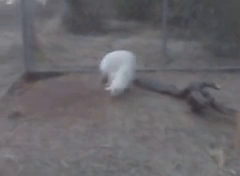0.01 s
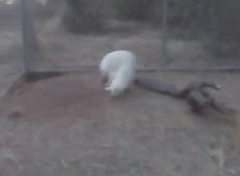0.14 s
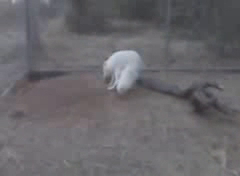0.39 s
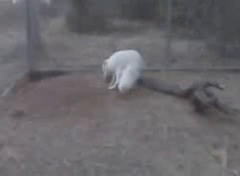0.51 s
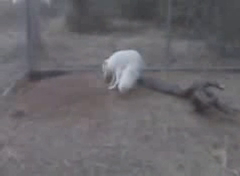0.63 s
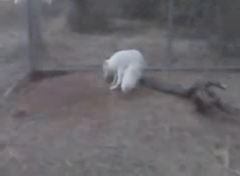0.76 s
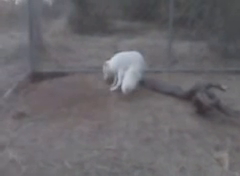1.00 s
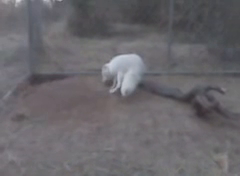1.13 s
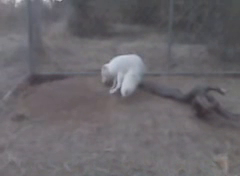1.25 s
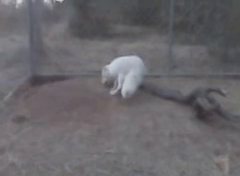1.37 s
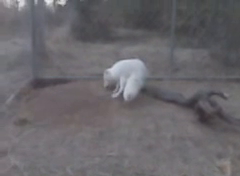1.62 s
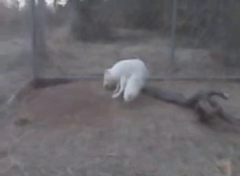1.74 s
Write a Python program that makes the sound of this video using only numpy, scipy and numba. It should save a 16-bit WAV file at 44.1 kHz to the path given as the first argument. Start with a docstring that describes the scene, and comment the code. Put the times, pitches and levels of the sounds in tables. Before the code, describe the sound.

A fox gives one loud, harsh cry in an outdoor pen. After a tiny mouth click and breath at 0.1 seconds, the cry scoops up raspily, peaks around 0.35 seconds with slight distortion, then sags slowly in pitch. It stops abruptly at 1.1 seconds with a puff of air and a very short echo. A faint dull bump follows at 1.3 seconds, and faint hiss runs throughout.

```python
"""An outdoor pen: a white fox gives one loud, harsh cry that scoops up, sags slowly and stops abruptly.
Throat pulses ring in five moving resonances over a chest tone, with rasp at the attack and the cutoff.
A mouth click and a breath lead in; a toneless puff, a short echo and a dull bump follow, over faint hiss.
The recorder hears only up to the low treble and is overloaded by the peaks of the cry."""
import sys
import numpy as np
from scipy import signal
from scipy.fft import rfft, irfft
from scipy.io import wavfile
from scipy.ndimage import uniform_filter1d
from numba import njit

SR = 44100
rng = np.random.default_rng(int(sys.argv[2]) if len(sys.argv) > 2 else 0)


def inscribe(sig):
    """Save sig as 16-bit PCM at rate SR to the path in sys.argv[1].

    A 1-D sig is mono; a 2-D sig holds one channel per row.
    Samples are clipped to [-1, 1] before scaling.
    """
    pcm = np.round(np.clip(np.atleast_2d(sig).T, -1, 1) * 32767)
    wavfile.write(sys.argv[1], SR, pcm.astype(np.int16))


N = 79380
T = np.arange(N) / SR


def cry():
    """The voice: unsteady throat pulses ring through the mouth, with the chest sounding underneath."""
    # pitch of the cry (time [s], pitch [Hz])
    pitch_curve = [(.15, 168), (.186, 195.8), (.22, 215.3), (.24, 220.7), (.298, 232.1), (.352, 233.6),
                   (.44, 231.2), (.55, 226.5), (.66, 222.6), (.77, 220), (.88, 219.2), (.99, 218.5),
                   (1.085, 218.9), (1.125, 199)]
    # rasp, the amount of turbulence and shake in the voice (time [s], level [dB])
    rasp_curve = [(.15, 2.5), (.19, -11), (.24, -28.5), (.28, -27), (.32, -14), (.43, -14), (.49, -22.5),
                  (.8, -24), (.88, -21.5), (1.08, -21), (1.11, 7)]
    pitch_hz, = in_time(pitch_curve)
    rasp = from_db(in_time(rasp_curve)[0])
    jitter = .0025 * drift(rate_hz=60)
    phase = 2 * np.pi * np.cumsum(pitch_hz * (1 + jitter)) / SR
    shake = rasp * flutter(phase)
    return vocal_tract(throat(phase, rasp, shake)) + chest(phase, rasp, shake)


def flutter(phase):
    """Strong and weak pulses alternate at a little over half the pulse rate, with wandering timing."""
    wander_rad = .89 * drift(rate_hz=26)
    return np.sqrt(2) * np.cos(.55 * phase + wander_rad)


def throat(phase, rasp, shake):
    """A buzz of pulses and pulsed turbulence; rasp makes single pulses come early or late."""
    stumbling = phase + .041 * rasp * drift(rate_hz=129)
    buzz = unit_rms(sum(np.cos(k * stumbling) for k in range(1, 21)))
    shimmer_db = .5 * drift(rate_hz=110)
    pulses = buzz * from_db(shimmer_db) * (1 + .8 * shake)
    # bright turbulence (frequency [Hz], relative level [dB])
    colour = [(100, -22), (4000, 8.5), (5000, -27)]
    turbulence = noise(colour) * (1 + .23 * np.cos(phase))
    return pulses + from_db(-4) * rasp * turbulence


def vocal_tract(source):
    """Five gliding resonances of throat and mouth shape the vowel, each riding its own level curve."""
    # resonance tracks, low to high (time [s], centre [Hz], level [dB])
    first = [(.14, 834, -41.5), (0.167, 896, -40), (0.189, 896, -27.5), (0.219, 930, -13),
             (0.281, 985, -15), (.33, 904, -16), (.41, 934, -16), (.52, 964, -14.5), (.7, 995, -13.5),
             (1.09, 970, -14.5), (1.103, 880, -28), (1.129, 860, -88)]
    second = [(.15, 1500, -74), (0.186, 1566, -38), (.23, 1514, -25.5), (.33, 1604, -22.5),
              (.41, 1640, -23), (.46, 1691, -17), (.54, 1603, -17.5), (.6, 1462, -20), (.7, 1420, -26),
              (.8, 1320, -30), (.95, 1450, -40), (1.09, 1520, -26), (1.11, 1450, -29)]
    third = [(.16, 2010, -90), (.22, 1810, -23.5), (.28, 1914, -20), (.39, 2080, -32), (.46, 2180, -19),
             (.54, 1915, -14), (.6, 1860, -34.5), (.68, 1890, -29.5), (.76, 1773, -19), (.95, 1845, -16.5),
             (1.09, 1862, -16), (1.12, 1690, -47)]
    fourth = [(.15, 2640, -63), (.2, 2910, -29), (.225, 2550, -23), (.28, 2880, -15), (.33, 2573, -17.5),
              (.45, 2466, -16), (.53, 2510, -19.5), (.6, 2726, -16), (.77, 2735, -16.5),
              (1.09, 2893, -16.5), (1.11, 2790, -75)]
    fifth = [(.08, 3320, -53), (.16, 3130, -45.5), (.2, 3310, -39), (.225, 3040, -17), (.28, 3070, -16.5),
             (.32, 3226, -11.5), (.41, 3220, -11), (.5, 3272, -14.5), (.6, 3126, -16.5), (.77, 3170, -19.5),
             (1.09, 3420, -32), (1.11, 3274, -46.5), (1.2, 3252, -53)]
    # shape of each resonance (width per filter pass [Hz], lag behind the pulse [ms])
    shapes = [(215, 0.5), (280, 0.15), (290, 0.11), (360, 0.21), (360, 0.25)]
    voice = 0
    for k, track in enumerate((first, second, third, fourth, fifth)):
        width_hz, lag_ms = shapes[k]
        centre_hz, level_db = in_time(track)
        angle = 2 * np.pi * centre_hz / SR
        radius = np.exp(-np.pi * width_hz / SR)
        ring = resonate(source, angle, radius)
        ring = hold_level(resonate(ring, angle, radius))
        delayed = np.interp(T - lag_ms / 1000, T, ring)
        polarity = (-1) ** k
        voice += polarity * delayed * from_db(level_db) * gate(track)
    return voice


def chest(phase, rasp, shake):
    """The body of the cry: a clean chest tone, plus a growling undertone and air that grow with rasp."""
    # swell of tone, growl and air together (time [s], level [dB])
    swell = [(.135, -54), (.165, -35.5), (.19, -30), (.225, -21.5), (.33, -15), (.55, -19.5), (.9, -20.5),
             (1.09, -21.5), (1.108, -45), (1.135, -77.5)]
    # chest harmonics (multiple of the pitch, relative level [dB])
    harmonics = [(1, -1.5), (2, -11.5), (3, -15)]
    # rush of air under the cry (frequency [Hz], relative level [dB])
    rush_colour = [(25, -22), (60, -10), (100, -8.5), (180, -6.5), (320, -10.5), (600, -7.5), (1200, -9),
                   (3400, -12.5)]
    lagged = phase - 2 * np.pi * .68  # trails the throat by part of a cycle
    tone = np.sqrt(2) * sum(from_db(db) * np.cos(multiple * lagged) for multiple, db in harmonics)
    growl = from_db(-10) * shake
    rush = from_db(5) * np.sqrt(rasp) * noise(rush_colour)
    return (tone + growl + rush) * envelope(swell)


def mouth_click():
    """A tiny, bright tick of the mouth just ahead of the voice."""
    # two-peaked tick (frequency [Hz], relative level [dB])
    colour = [(60, -56), (300, -37), (1200, -18.5), (1700, 3), (2400, -12.5), (3200, 8.5), (3800, -13),
              (4500, -28)]
    return burst(colour, start_s=.083, level_db=-33, decay_s=.004)


def opening_breath():
    """A thin hiss of air as the mouth opens."""
    # rise of the breath (time [s], level [dB])
    swell = [(.094, -53.5), (.12, -44), (.165, -42.5), (.2, -45)]
    # its thin colour (frequency [Hz], relative level [dB])
    colour = [(600, -17.5), (1500, -9.5), (2200, -4), (3100, 3), (3600, -4), (4200, -20.5)]
    return noise(colour) * envelope(swell)


def puff():
    """Toneless air through the open mouth, strongest as the voice starts and as it stops."""
    # airflow (time [s], level [dB])
    swell = [(.1, -47), (.135, -44), (.16, -32), (.21, -31.5), (.3, -38.5), (1.06, -47), (1.1, -26),
             (1.125, -40), (1.16, -41.5), (1.21, -55), (1.3, -66)]
    # its midrange colour (frequency [Hz], relative level [dB])
    colour = [(120, -17.5), (250, -8.5), (550, -2), (850, -1.5), (1300, 2.5), (1700, 8), (2200, -6.5),
              (3200, -9.5), (3700, -28.5), (4500, -39)]
    return noise(colour) * envelope(swell)


def pen_echo(fox):
    """A short diffuse echo from ground and fence."""
    # colour of the reflections (frequency [Hz], relative level [dB])
    colour = [(100, -12.5), (300, -15.5), (600, -7.5), (1400, 18), (2200, 1.5), (3400, 4.5)]
    t60_s, predelay_s, wet_db = .11, .0068, -13.5
    tail = noise(colour) * from_db(-60 * T / t60_s) * (T > predelay_s)
    tail /= np.sqrt(np.sum(tail ** 2))
    return from_db(wet_db) * signal.fftconvolve(fox, tail)[:N]


def bump():
    """A faint, dull bump after the cry."""
    # low-mid thud (frequency [Hz], relative level [dB])
    colour = [(40, -35), (120, -16), (280, 2), (450, -3), (1000, -16), (3000, -10)]
    return burst(colour, start_s=1.283, level_db=-49.5, decay_s=.018)


def hiss():
    """A faint, steady bed of hiss."""
    # colour of the bed (frequency [Hz], relative level [dB])
    colour = [(25, -28.5), (60, -17.5), (150, -15), (300, -6), (600, -4.5), (1000, -8.5), (2000, -5),
              (3200, 0), (3600, -7.5), (4200, -36), (6000, -74)]
    return from_db(-57.5) * noise(colour)


def from_db(db):
    """Decibels to gain."""
    return 10 ** (np.asarray(db) / 20)


def unit_rms(x):
    """Scale to unit rms."""
    return x / np.sqrt(np.mean(x ** 2) + 1e-20)


def hold_level(x):
    """Ride the gain so the short-term level stays near unit rms."""
    power = uniform_filter1d(uniform_filter1d(x * x, size=600), size=600)
    return x / np.sqrt(np.abs(power) + 1e-12)


def in_time(curve):
    """Each value column of a curve at every sample."""
    times, *columns = np.transpose(curve)
    return [np.interp(T, times, column) for column in columns]


def gate(curve):
    """Open while a curve lasts, with short fades outside it."""
    start, end = curve[0][0], curve[-1][0]
    return np.interp(T, [start - .01, start, end, end + .02], [0, 1, 1, 0])


def envelope(curve):
    """A level curve as gain, faded to silence beyond its ends."""
    return from_db(in_time(curve)[0]) * gate(curve)


def noise(colour):
    """Noise of unit rms with the given colour."""
    hz, db = np.transpose(colour)
    freqs = np.maximum(np.fft.rfftfreq(N, 1 / SR), 1)
    gain = from_db(np.interp(np.log(freqs), np.log(hz), db))
    return unit_rms(irfft(rfft(rng.standard_normal(N)) * gain, N))


def burst(colour, start_s, level_db, decay_s):
    """A short noise that starts at once and dies away."""
    age = T - start_s
    return from_db(level_db) * noise(colour) * (age > 0) * np.exp(-np.abs(age) / decay_s)


def drift(rate_hz):
    """A smooth random wobble of unit rms."""
    lowpass = signal.butter(2, rate_hz, fs=SR, output="sos")
    return unit_rms(signal.sosfilt(lowpass, rng.standard_normal(N)))


@njit
def resonate(x, angle, radius):
    """A two-pole resonance whose centre moves."""
    y = np.zeros(len(x))
    for i in range(2, len(x)):
        drive = (1 - radius) * (x[i] - x[i - 2])
        y[i] = drive + 2 * radius * np.cos(angle[i]) * y[i - 1] - radius * radius * y[i - 2]
    return y


def scene():
    """The fox and its echo over the background, in mono."""
    fox = mouth_click() + opening_breath() + puff() + cry()
    background = hiss() + bump()
    return (fox + pen_echo(fox) + background)[None]


def record(dry):
    """A narrow-band input, then lopsided overload that throws crackle into the treble, then a top cut."""
    band_edge_hz, top_cut_hz = 3650, 15400
    ceiling, bias = .73, .025
    narrow = signal.sosfilt(signal.butter(14, band_edge_hz, fs=SR, output="sos"), dry)
    clipped = np.clip(narrow + bias, -ceiling, ceiling) - bias
    return signal.sosfilt(signal.ellip(10, .1, 80, top_cut_hz, fs=SR, output="sos"), clipped)


dry = scene()
out = record(dry)
inscribe(out)
```